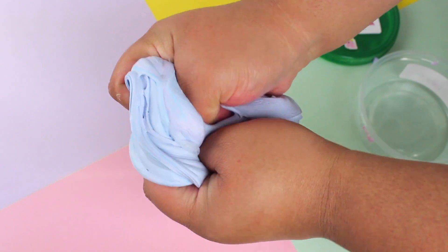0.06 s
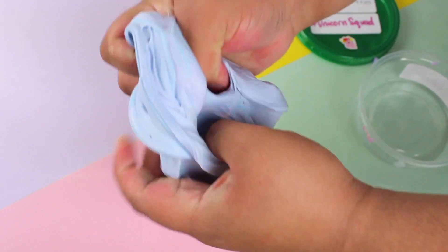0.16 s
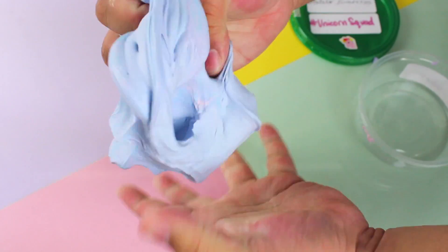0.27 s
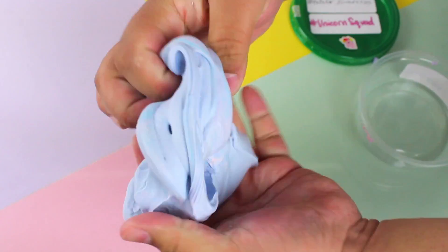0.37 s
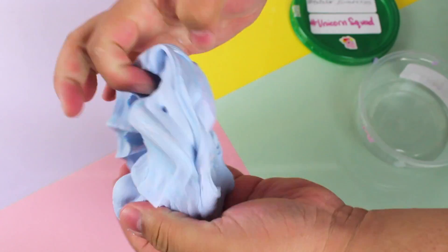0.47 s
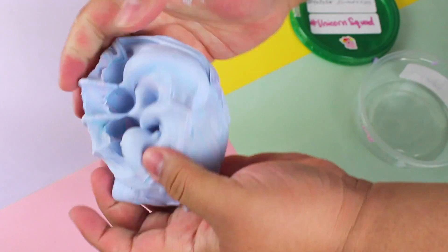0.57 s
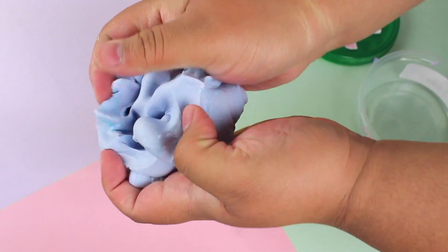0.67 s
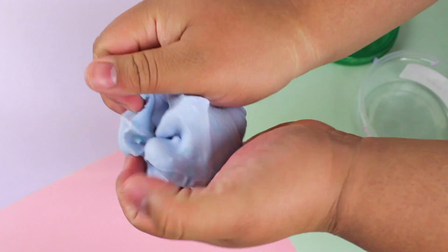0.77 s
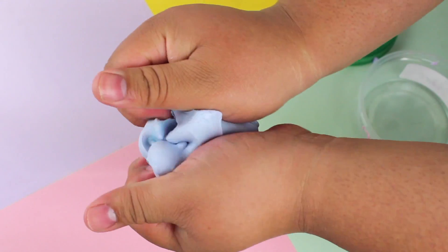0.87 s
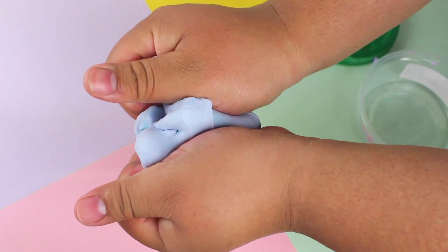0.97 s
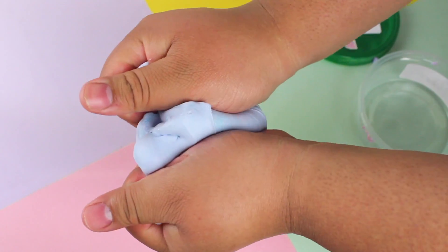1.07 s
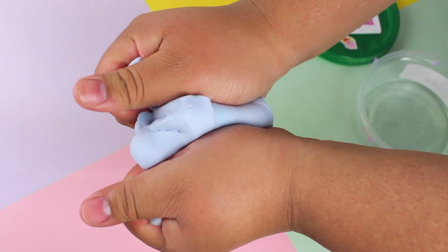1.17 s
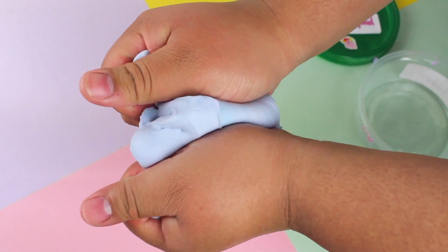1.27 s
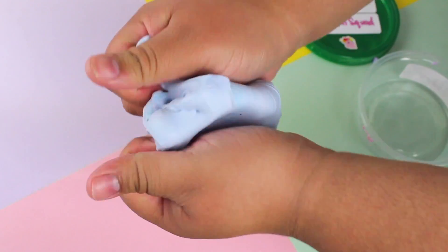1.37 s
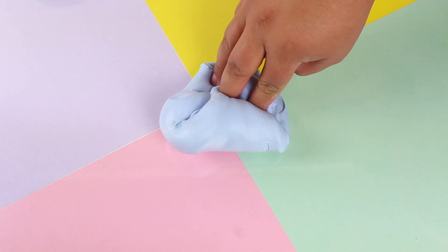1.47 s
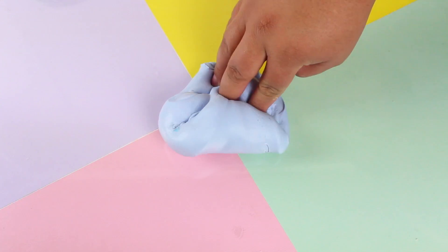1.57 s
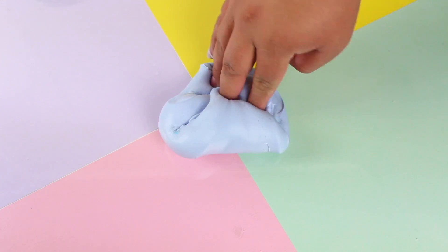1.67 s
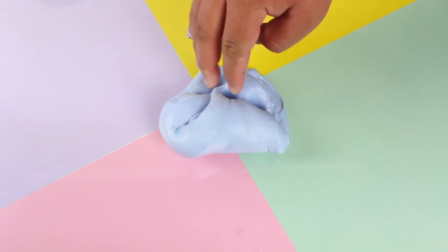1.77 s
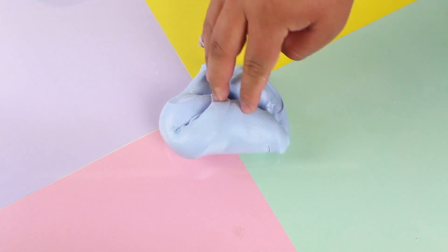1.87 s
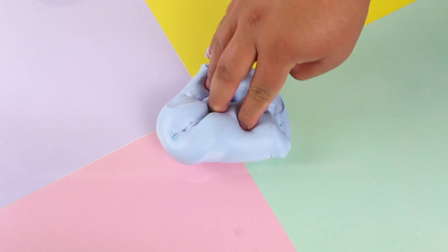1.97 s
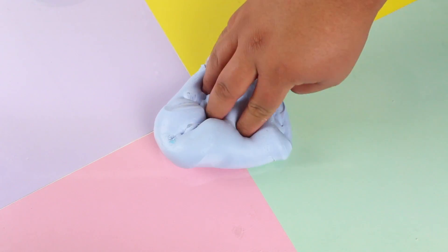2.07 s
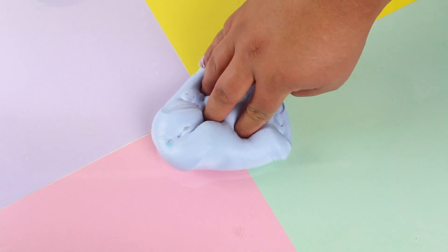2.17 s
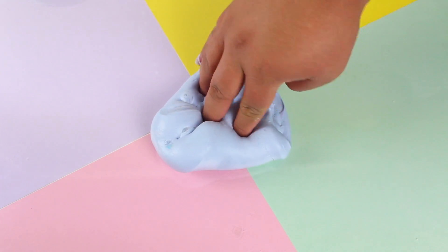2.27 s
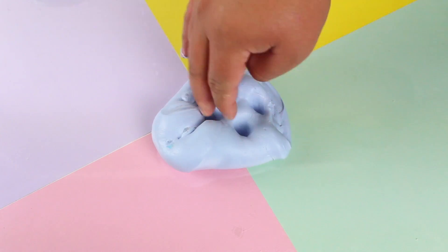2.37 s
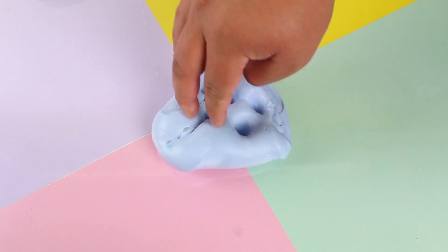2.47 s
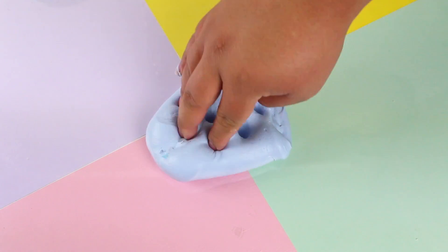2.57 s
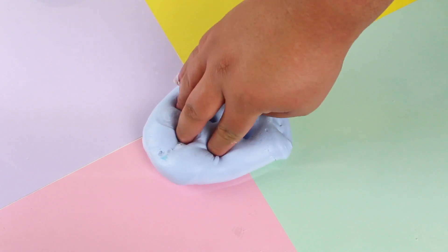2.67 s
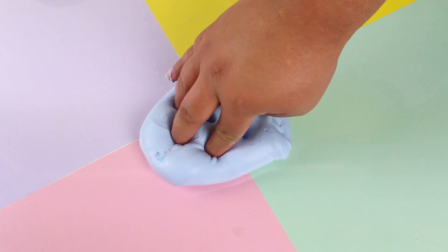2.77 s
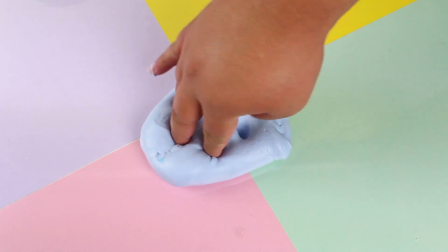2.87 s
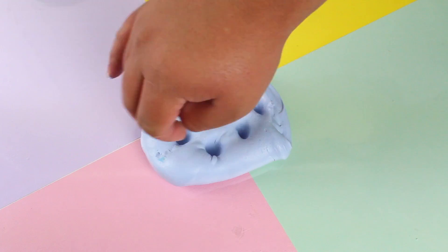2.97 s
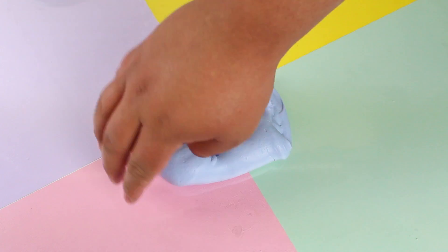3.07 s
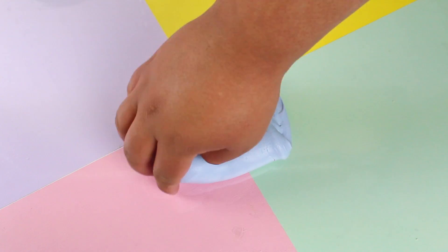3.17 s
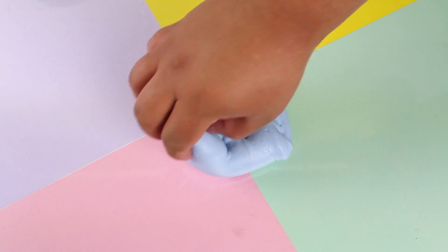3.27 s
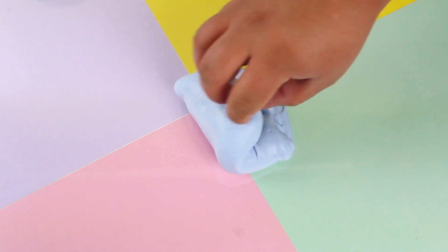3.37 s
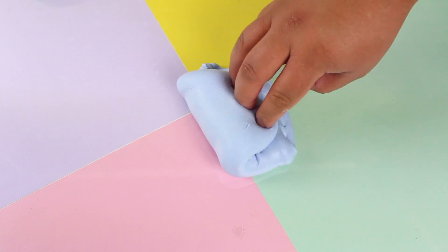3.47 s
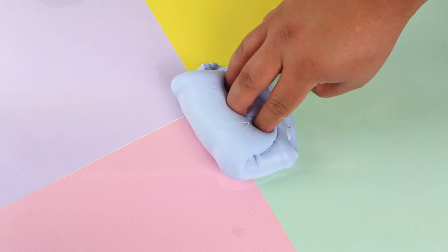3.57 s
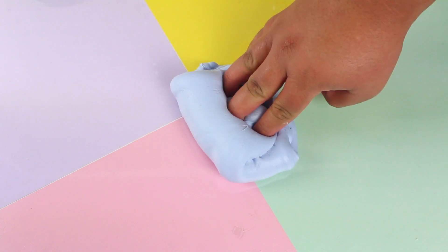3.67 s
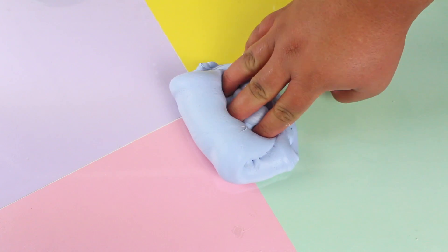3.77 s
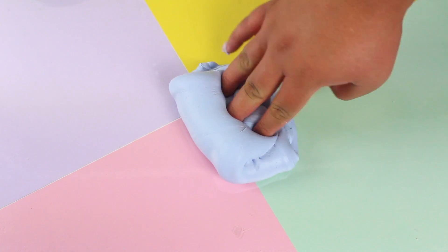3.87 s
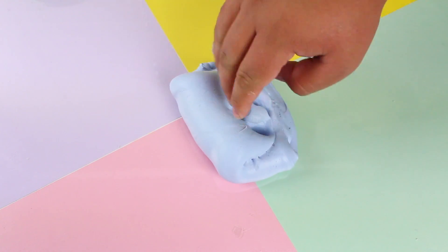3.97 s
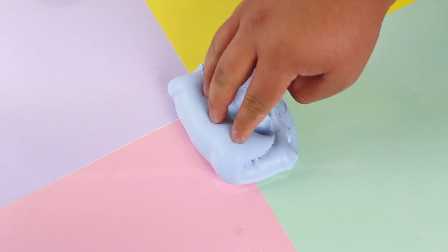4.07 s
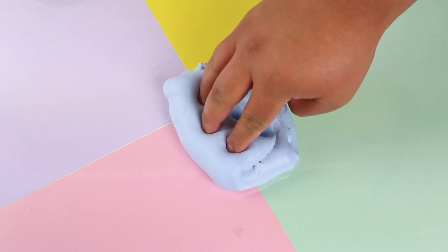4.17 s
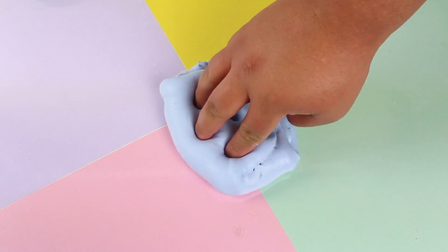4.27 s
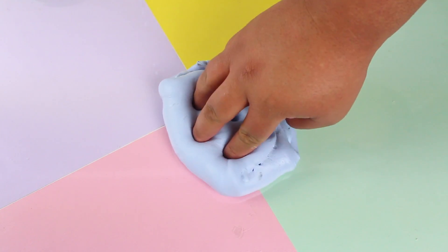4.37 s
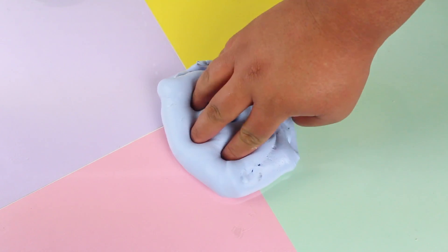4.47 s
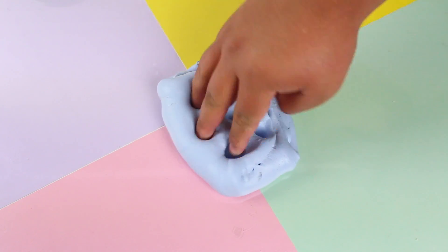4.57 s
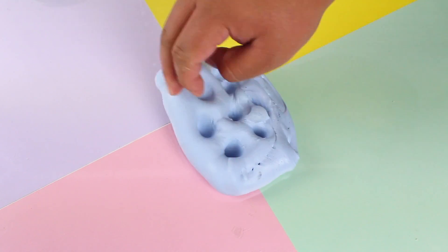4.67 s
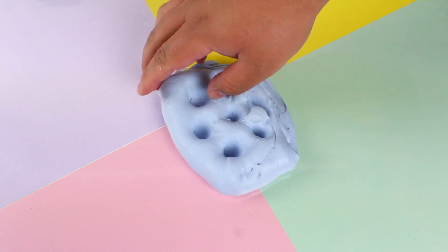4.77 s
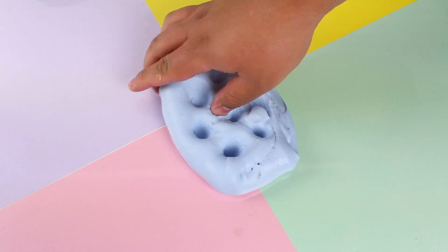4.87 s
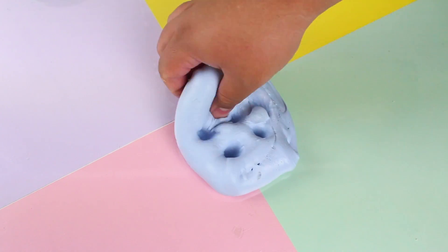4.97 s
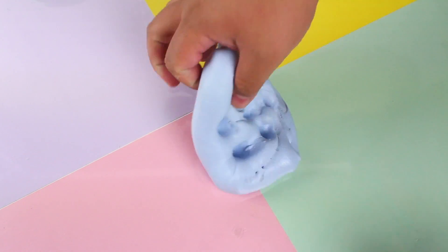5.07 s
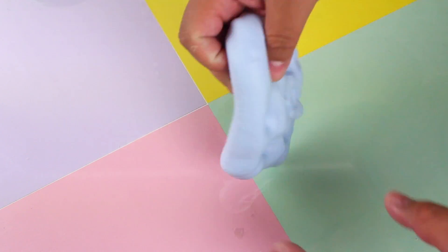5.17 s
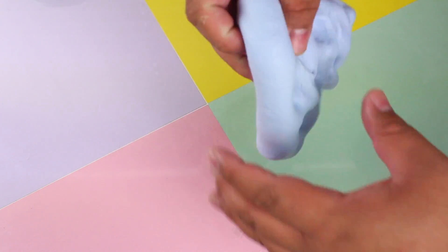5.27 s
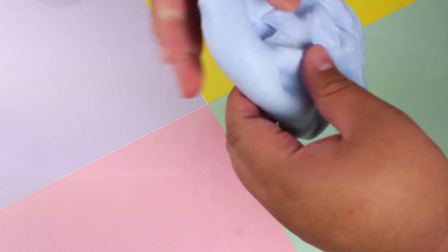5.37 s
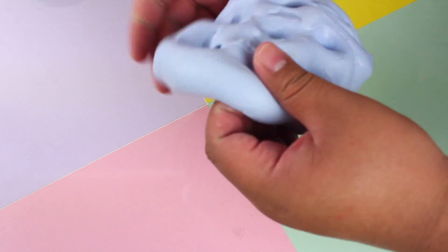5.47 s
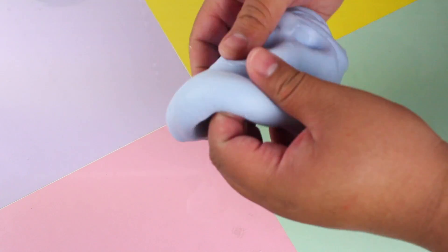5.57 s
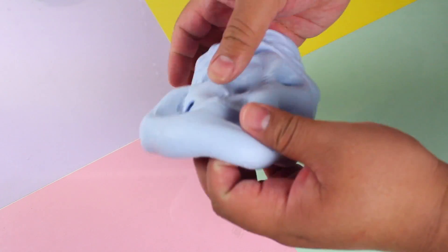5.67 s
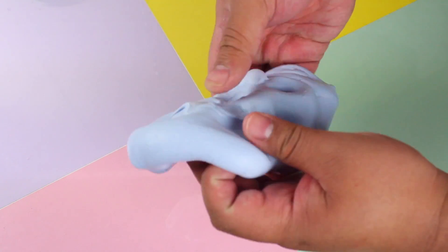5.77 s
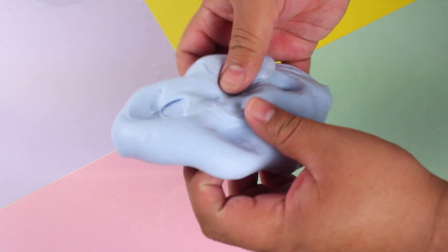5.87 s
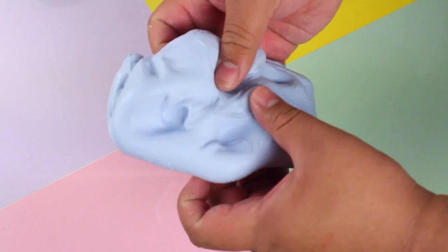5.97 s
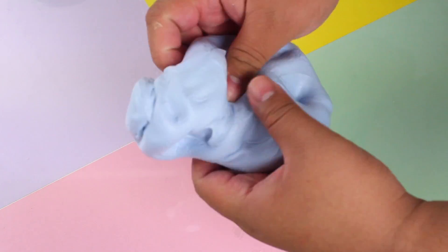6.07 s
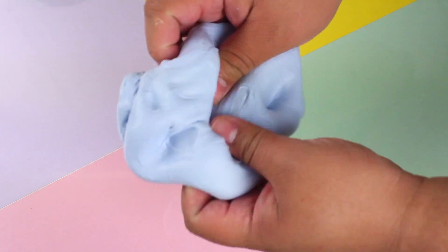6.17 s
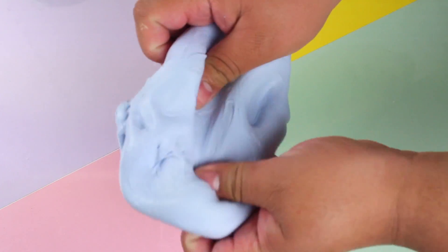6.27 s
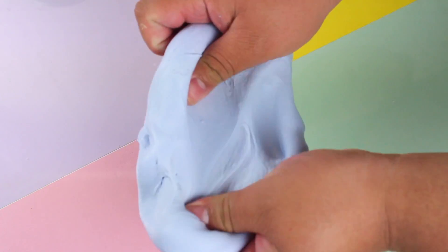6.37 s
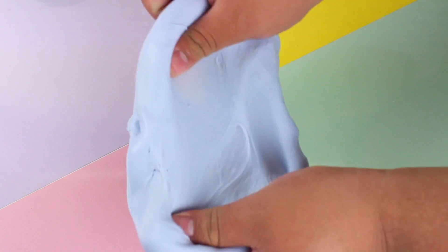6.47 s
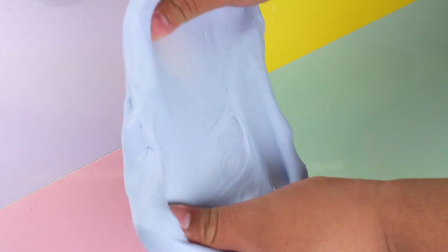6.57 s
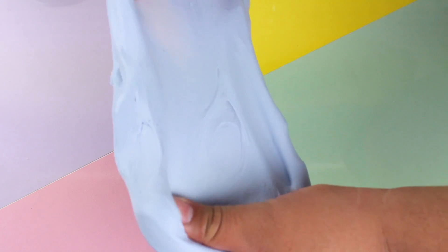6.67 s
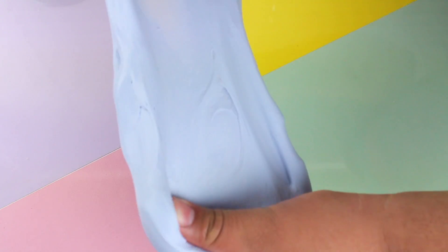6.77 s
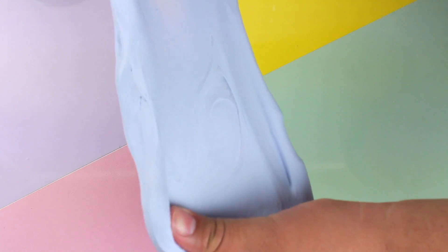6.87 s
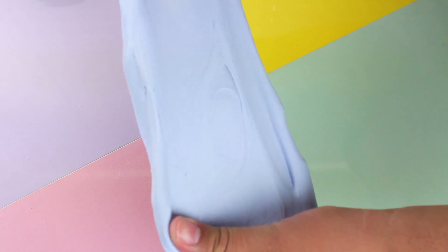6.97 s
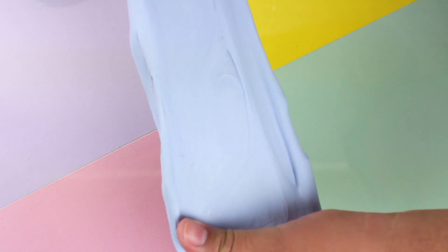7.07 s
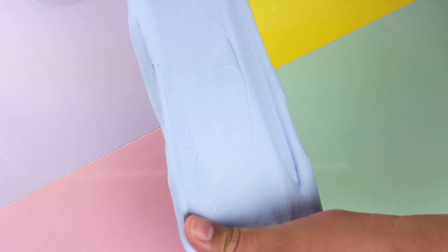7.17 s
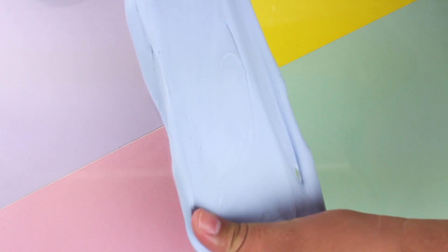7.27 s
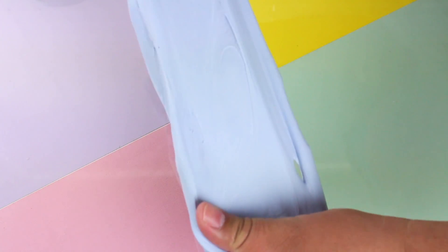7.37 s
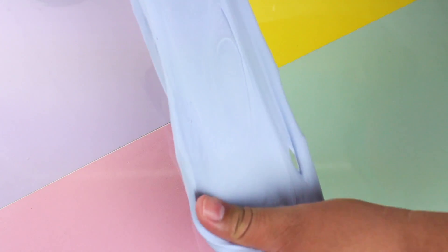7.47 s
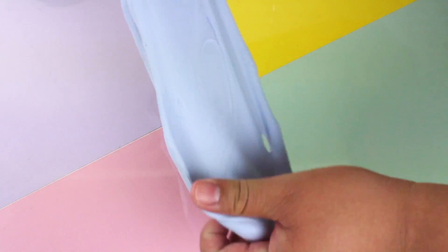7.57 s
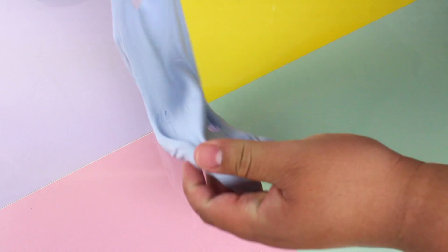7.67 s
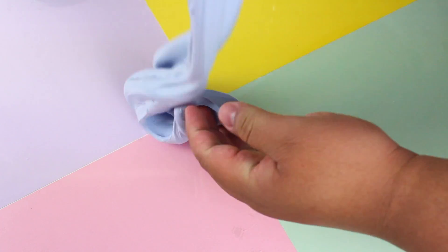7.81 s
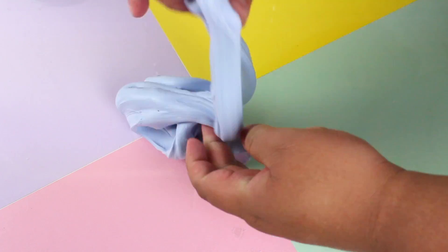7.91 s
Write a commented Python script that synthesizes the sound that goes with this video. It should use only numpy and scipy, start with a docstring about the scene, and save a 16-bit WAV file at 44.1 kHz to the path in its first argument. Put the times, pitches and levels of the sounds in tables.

```python
"""Over a faint hum in a small, quiet room, hands fold and squeeze thick slime on a table: skin crackles,
then trapped air bursts in sharp pops, made of damped pings and noise. A cut at 1.548 s ends this scene.
In the next, fingers pull out of their holes with hollow plops that shake the table, and hands land on slime
and table. Last, the slime is stretched into a sheet: noise and tiny ringing clicks give its crackle,
while gliding strings of bubbles let air squeak out."""
import sys
import numpy as np
from scipy import signal
from scipy.fft import rfft, irfft, next_fast_len
from scipy.io import wavfile

SR = 44100
rng = np.random.default_rng(int(sys.argv[2]) if len(sys.argv) > 2 else 0)


def store_wav(level_fs):
    """Save 16-bit WAV to argv[1]."""
    pcm = np.round(np.clip(np.atleast_2d(level_fs), -1, 1) * 32767)
    wavfile.write(sys.argv[1], SR, pcm.T.astype(np.int16))


N = 350149
TIME = np.arange(N) / SR  # seconds
CUT_S = 1.548  # a cut from the squeezing scene to the next one, in seconds

# Air pockets bursting between the palms. Each row: start in seconds, snap level in dB, snap pitch in Hz,
# snap length in cycles, pitch of the air pocket in Hz, pocket level in dB.
POPS = [(0.2189, -13, 3800, 6.6, 380, -25.5), (0.8715, -14, 2083, 3.9, 420, -35),
        (1.0211, -15.5, 3800, 2, 1200, -25), (1.2405, 8.5, 4080, 5.3, 2040, -1),
        (1.2803, -28, 1960, 3.3, 463, -15.5), (1.2892, -8.5, 4984, 4.2, 2519, -35),
        (1.3146, 2.5, 3900, 8, 1130, -7), (1.3184, 19, 3830, 4.5, 1001, -0.5),
        (1.3538, 9, 7000, 4.9, 2520, -0.5)]
# A finger pulls out of its hole. Each row: the six columns of POPS, then the level in dB of the
# peeling that leads up to it, before the trims in sliding and peeling.
PLOPS = [(1.7863, -6.5, 3910, 2.7, 1040, -17.5, -65.5), (1.7965, -11, 3000, 2, 1948, -10.5, -65.5),
         (2.4054, -0.5, 3030, 1.54, 944, -9, -53), (2.4376, -1, 1900, 3.2, 980, -11, -56),
         (2.9746, -15.5, 3160, 0.93, 520, -27.5, -48.5), (3.016, -4.5, 3030, 3, 1000, -12, -43.5),
         (3.9961, -9.5, 2120, 3.4, 660, -13.5, -43), (4.0219, -2, 2178, 6.9, 501, -10, -43),
         (4.6747, 6, 2280, 1.17, 470, -8, -62.5)]
# The hand lands on slime and table. Each row: start in seconds, thump level in dB before the table's trim,
# softness of the contact as a low-pass in Hz, pat level in dB, pat pitch in Hz, trapped air pitch in Hz.
LANDINGS = [(3.2337, -18, 211, -18.5, 1590, 647), (3.255, -17.5, 125, -33, 1990, 1500),
            (4.8288, -25, 250, -34.5, 1474, 450), (4.9562, -25, 346, -25, 1610, 322),
            (5.0138, -34.5, 300, -35, 1790, 650)]


def from_db(db):
    """Turn decibels into gain."""
    return 10 ** (np.asarray(db) / 20)


def rms_one(x):
    """Scale a sound to unit rms."""
    return x / np.sqrt(np.mean(x ** 2) + 1e-20)


def at_hz(points, hz):
    """Read a table between its points, on a log-frequency axis."""
    f, value = np.transpose(points)
    return np.interp(np.log(np.maximum(hz, 1)), np.log(f), value)


def butter(x, hz, kind, order=2):
    """Filter a sound with a causal Butterworth filter."""
    return signal.sosfilt(signal.butter(order, hz, kind, fs=SR, output="sos"), x)


def add(out, s, sound):
    """Mix a sound in at time s, in seconds."""
    i = max(int(round(s * SR)), 0)
    out[i:i + len(sound)] += sound[:max(N - i, 0)]


def drift(rate):
    """A smooth random curve of unit rms that heads for `rate` new values a second."""
    knots = rng.standard_normal(N // 20)
    return rms_one(np.interp(TIME * rate, np.arange(len(knots)), knots))


def coloured(spectrum):
    """Noise of unit rms with the given spectrum."""
    size = next_fast_len(N)
    gain = from_db(at_hz(spectrum, np.arange(size // 2 + 1) * SR / size))
    return rms_one(irfft(rfft(rng.standard_normal(size)) * gain, size)[:N])


def ping(hz, cycles, rise=0, size=3000):
    """A damped oscillation of peak 1 that falls by 60 dB in so many cycles while its pitch may rise."""
    t = TIME[:size]
    age = np.minimum(t * hz / cycles, 4)
    phase = 2 * np.pi * np.cumsum(hz * (1 + rise * np.minimum(age, 1))) / SR
    onset = 1 - np.exp(-2 * np.pi * hz * t)
    wave = np.diff(np.sin(phase) * from_db(-60 * age) * onset, prepend=0)
    return wave / np.abs(wave).max()


def background():
    """Soft rumble of room air with a few hum lines that waver slightly in level and phase."""
    # Each row: frequency in Hz, level in dB per Hz before scaling to unit rms.
    rumble_spectrum = [(15, -60.5), (25, -26.5), (53, -13.5), (92, -7.5), (123, -5.5), (170, -11),
                       (217, -5), (270, -9.5), (354, -7.5), (384, -12.5), (545, -18.5), (936, -25.5),
                       (1020, -27), (2760, -39), (16000, -47)]
    # Steady hum. Each row: frequency in Hz, middle level in dB rms.
    hum_lines = [(118.4, -75.5), (220.7, -63), (301.5, -65), (355.3, -70), (532.9, -71)]
    hum = np.zeros(N)
    for hz, db in hum_lines:
        level = from_db(db + 2.2 * drift(3.5)) * np.sqrt(2)
        hum += level * np.sin(2 * np.pi * hz * TIME + 1.4 * drift(4))
    return hum + from_db(-53) * coloured(rumble_spectrum)


def room_tails(build_s=.005, count=9):
    """Split the spectrum into overlapping bands, each with its own swell and decay of the room's answer."""
    # Each row: frequency in Hz, time in seconds for the room to fade by 60 dB.
    fade_times = [(100, 4), (300, 0.06), (700, 0.42), (1500, 0.33), (4000, 0.31), (8000, 0.29),
                  (15000, 0.5)]
    # Each row: frequency in Hz, level in dB of the room's answer before the level set for each sound.
    answer_levels = [(100, 1), (300, 5), (600, -3.5), (1500, -2), (4000, -8), (8000, -8), (15000, -18)]
    t, freqs = TIME[:2 ** 14], np.arange(2 ** 13 + 1) * SR / 2 ** 14
    hz = np.geomspace(60, 15000, count)[:, None]
    shares = np.array([np.interp(freqs, hz[:, 0], own) for own in np.eye(count)])
    decay = np.exp(-np.log(1000) * t / at_hz(fade_times, hz)) * (1 - np.exp(-t / build_s))
    energy = np.sum(decay ** 2, axis=1, keepdims=True)
    return shares, from_db(at_hz(answer_levels, hz)) * decay / np.sqrt(energy)


def in_room(sound, room, near_db, room_db, near_s=0.0041, near_start_s=0.00044):
    """Direct sound, scatter off hands and table, and a diffuse tail; hands move, so paths are new each time."""
    bands, decay = room
    t = TIME[:decay.shape[1]]
    near, far = rng.standard_normal((2, len(t)))
    near = butter(near * np.exp(-t / near_s) * (t > near_start_s), 5500, "low", order=1)
    tail = np.sum(irfft(rfft(far) * bands) * decay, axis=0)
    response = from_db(near_db) * np.sqrt(2 / (near_s * SR)) * near + from_db(room_db) * tail
    response[0] += 1  # direct sound
    return signal.fftconvolve(sound, response)


def table(level_db=-3.5, spread_db=4.5, low_share=0.22):
    """Each push or release rings the table's modes; a quicker contact reaches less far down."""
    # Ways the table top rings. Each row: frequency in Hz, relative level in dB, seconds to fade by 60 dB.
    modes = [(76.2, -5.5, 0.53), (120.6, -7, .2), (149.2, -5, 0.22), (197, -3, 0.29), (250, -15, 0.14),
             (295.2, -4, 0.33), (372.9, -6, 0.14), (469.8, -1, 0.087), (562, -4.5, 0.3)]
    out, t = np.zeros(N), TIME[:SR * 2 // 3]
    hz, mode_db, t60 = np.transpose(modes)[:, :, None]
    # each plop tugs at the table, a louder one a little harder, through a 410 Hz low-pass
    tugs = [(s, -23 + 0.17 * pocket_db, 410) for s, *_, pocket_db, _ in PLOPS]
    for s, blow_db, soft_hz, *_ in [*tugs, *LANDINGS]:
        strength = from_db(mode_db + spread_db * rng.standard_normal(hz.shape))
        strength = strength * rng.choice([-1, 1], hz.shape)
        rings = strength * np.sin(2 * np.pi * hz * t) * np.exp(-np.log(1000) * t / t60)
        softened = butter(rings.sum(axis=0), soft_hz, "low")
        thump = butter(softened, low_share * soft_hz, "high", order=1)
        add(out, s, from_db(blow_db + level_db) * thump)
    return butter(out, 80, "high", order=4)


def squirts(per_s=420, cycles=9.8, spread_db=2.5, scatter=0.05):
    """Air escapes as a quick string of bubbles whose pitch glides as the gap narrows or opens."""
    # Air squeezed through narrow gaps. Each row: start in seconds, length in seconds, first pitch in Hz,
    # last pitch in Hz, typical bubble level in dB at mid-string.
    gaps = [(5.46, 0.036, 870, 960, -39.5), (5.946, 0.034, 850, 1100, -46),
            (6.117, 0.11, 2580, 4630, -39.5), (7.275, 0.027, 1760, 1950, -47.5),
            (7.32, 0.025, 1950, 2230, -49.5), (7.618, 0.069, 2980, 2620, -37)]
    out = np.zeros(N)
    for s, length, start_hz, end_hz, db in gaps:
        # 64 possible bubbles, of which chance keeps about per_s a second
        for _ in range(64):
            phase, kept = rng.random(2)
            size, detune = rng.standard_normal(2)
            if kept < per_s * length / 64:
                hz = (start_hz + phase * (end_hz - start_hz)) * np.exp(scatter * detune)
                level = from_db(db + spread_db * size) * np.sqrt(np.sin(np.pi * phase))
                add(out, s + phase * length, level * ping(hz, cycles))
    return out


def faint_ticks(per_s=4.1, spread_db=2.5, middle_hz=3800, spread_octaves=0.45):
    """Pressing or pulling sets off runs of ticks of chance size and pitch; gives (s, dB, Hz) rows."""
    # Each row: start in seconds, length in seconds, typical level in dB before the trim in ticks.
    runs = [(0.497, 0.89, -36.5), (2.64, 0.18, -36), (4.27, 0.072, -38), (5.705, 0.94, -36),
            (7.199, 0.15, -46.5)]
    for start, length, db in runs:
        count = max(int(round(per_s * length)), 1)
        for k, (size, detune) in enumerate(rng.standard_normal((count, 2))):
            s = start + length * (k + rng.random()) / count
            yield s, db + spread_db * size, min(middle_hz * 2 ** (spread_octaves * detune), SR / 4)


def ticks(room, cycles=3.4, level_db=1.0, fray_db=-21, fray_s=0.006, body_ratio=0.4, body_db=-12):
    """Tiny bursts: a short ping with a frayed noise edge and a softer, lower body; gives (s, sound) pairs."""
    # Single larger bubbles and sticky threads snapping.
    # Each row: start in seconds, level in dB before the trim level_db, pitch in Hz.
    single_ticks = [(0.0326, -19.5, 5040), (0.0633, -20.5, 9300), (0.0911, -20.5, 3930),
                    (0.9292, -25.5, 2030), (1.1075, -9.5, 5630), (1.1383, -21, 4970), (1.1994, -23, 3900),
                    (1.311, -5, 4960), (2.105, -42.5, 1904), (2.1711, -41.5, 2870), (2.6764, -36, 1130),
                    (2.7801, -39.5, 2510), (3.4797, -39.5, 1814), (3.632, -33, 4260), (3.7573, -35, 2730),
                    (4.2454, -38.5, 2560), (4.8119, -32.5, 1470), (5.1452, -27.5, 3700),
                    (5.5553, -33, 3040), (5.6617, -32.5, 3690), (6.0185, -37, 7000), (6.1952, -45, 4200),
                    (6.534, -34, 6560), (7.014, -39.5, 3670), (7.8202, -28.5, 3720)]
    t = TIME[:SR // 100]
    for s, tick_db, hz in [*single_ticks, *faint_ticks()]:
        body = from_db(body_db) * ping(body_ratio * hz, cycles, size=len(t))
        tick = ping(hz, cycles, size=len(t)) + body
        fray = from_db(fray_db) * rng.standard_normal(len(t)) * np.exp(-t / fray_s)
        yield s, in_room(from_db(tick_db + level_db) * (tick + fray), room, near_db=0.5, room_db=-0.5)


def swell(s, rise_s, fade_s, depth_db=17):
    """Gain that grows to 1 at time s and dies away, evenly in dB; if it peaks before the cut, it ends there."""
    away = np.maximum((s - TIME) / rise_s, (TIME - s) / fade_s)
    return from_db(-depth_db * np.minimum(away, 10)) * ((TIME < CUT_S) | (s > CUT_S))


def sliding(rise_share=0.42):
    """Gains of squelch and hiss: the long stretch, each change of grip, and the peeling before each plop."""
    # The slime is drawn out into a sheet, crackling less as it thins.
    # Each row: time in seconds, squelch level in dB, sticky hiss level in dB, both before trims.
    stretch = [(5.24, -54.5, -70.5), (5.41, -56, -64.5), (5.47, -48.5, -54.5), (5.6, -57, -67),
               (5.76, -46.5, -59), (5.79, -59.5, -66), (5.96, -47.5, -57), (5.99, -66.5, -73.5),
               (6.18, -53, -62), (6.35, -60, -64), (6.56, -55, -58.5), (6.93, -79, -81), (7.02, -64, -74.5),
               (7.08, -74.5, -88), (7.23, -59.5, -80), (7.54, -82, -84)]
    # The hands change grip and slide over the slime. Each row: time of the peak in seconds,
    # length in seconds, squelch level in dB, sticky hiss level in dB, both before the trims in peeling.
    rubs = [(0.021, 0.092, -44, -50), (0.264, 0.19, -37.5, -38), (0.433, 0.25, -47.5, -50),
            (0.553, 0.16, -48, -49), (0.705, 0.32, -56.5, -57), (1.007, 0.32, -62, -58),
            (1.117, 0.28, -65, -51), (1.52, 0.3, -40.5, -39), (3.326, 0.36, -55, -56.5),
            (5.02, 0.17, -52, -58), (5.14, 0.26, -48.5, -50), (7.647, 0.18, -53.5, -52),
            (7.76, 0.58, -54, -56), (7.93, 0.12, -56, -56)]
    s, wet_db, sticky_db = np.transpose(stretch)
    levels = (wet_db - 6, sticky_db - 2.5)
    power = np.array([from_db(np.interp(TIME, s, db, left=-np.inf, right=-np.inf)) ** 2 for db in levels])
    for s, length, wet_db, sticky_db in rubs:
        gain = swell(s, rise_share * length, (1 - rise_share) * length)
        power += (from_db([[wet_db], [sticky_db]]) * gain) ** 2
    # the skin peels ever louder until the finger is free
    for s, *_, peel_db in PLOPS:
        power += (from_db([[peel_db], [peel_db - 3]]) * swell(s, rise_s=0.036, fade_s=0.022)) ** 2
    return np.sqrt(power)


def grains(spectrum, per_s, size_db, cycles, patchy_db, count=20):
    """Countless micro-bubbles of `count` pitches burst in clumps: random clicks ring resonators; unit rms."""
    sizes = from_db(size_db * np.minimum(rng.exponential(1, N), 4.5)) * rng.choice([-1, 1], N)
    clicks = sizes * (rng.random(N) < per_s / SR)
    dealt, out = rng.integers(0, count, N), np.zeros(N)  # each click is dealt to one pitch
    for k, hz in enumerate(np.geomspace(spectrum[0][0], min(spectrum[-1][0], SR / 3), count)):
        r = np.exp(-np.log(1000) * hz / (cycles * SR))
        resonator = [1, -2 * r * np.cos(2 * np.pi * hz / SR), r * r]
        rings = signal.lfilter([1, 0, -1], resonator, clicks * (dealt == k) + 1e-18)
        out += rms_one(rings) * np.sqrt(hz) * from_db(at_hz(spectrum, hz) + patchy_db * drift(35))
    return rms_one(out)


def peeling(squelch_db=2.0, hiss_db=-4.5, wet_smooth_db=-3, hiss_smooth_db=-1, slip_db=2.5, slips_per_s=70):
    """Wet crackle and a finer sticky hiss over smooth friction; skin sticks and slips in quick bursts."""
    # Wet squelch. Each row: frequency in Hz, relative level in dB per Hz.
    wet_spectrum = [(300, -8.5), (700, -1), (1150, 1), (1600, 2.5), (2300, -1.5), (4500, -3), (6500, -21.5)]
    # Sticky hiss. Each row: frequency in Hz, relative level in dB per Hz.
    sticky_spectrum = [(3000, -9), (5000, 0), (8000, 0.5), (12000, -2.5), (16000, -7.5)]
    wet, sticky = sliding()
    squelch = grains(wet_spectrum, per_s=2000, size_db=3.5, cycles=11.0, patchy_db=4.5)
    squelch += from_db(wet_smooth_db) * coloured(wet_spectrum)
    hiss = grains(sticky_spectrum, per_s=3100, size_db=2.5, cycles=9.9, patchy_db=1.0)
    hiss += from_db(hiss_smooth_db) * coloured(sticky_spectrum)
    squelch = wet * from_db(squelch_db) * butter(squelch, 280, "high")
    hiss = sticky * from_db(hiss_db) * butter(hiss, 4200, "high")
    return (squelch + hiss) * from_db(slip_db * drift(slips_per_s))


def thuds(thud_hz=190, cycles=5.0, level_db=-39):
    """The slime slumps into each burst pocket with a dull thud; gives (s, sound) pairs."""
    for s, snap_db, *_ in POPS:
        yield s, from_db(snap_db + level_db) * ping(thud_hz, cycles)


def holes(room, hole_hz=573, cycles=2.9, level_db=-7, delay_s=0.002034):
    """The finger-wide hole left open rings with one hollow note after each plop; gives (s, sound) pairs."""
    for s, *_, pocket_db, _ in PLOPS:
        note = from_db(pocket_db + level_db) * ping(hole_hz, cycles)
        yield s + delay_s, in_room(note, room, near_db=4.0, room_db=-1.0)


def pats(cycles=5, pocket_db=-30):
    """Skin pats the slime with a short snap and traps a little air; gives rows like those of POPS."""
    return [(s, pat_db, pat_hz, cycles, air_hz, pocket_db) for s, _, _, pat_db, pat_hz, air_hz in LANDINGS]


def pops(room, pocket_cycles=6.4, rise=0.09, overtone=2.2, overtone_db=-7,
         tear_db=-20, tear_s=0.0016, creak_db=-44, creak_s=0.012):
    """A pocket's skin strains and snaps; the air behind rings in two modes; gives (s, sound) pairs."""
    t = TIME[:SR // 16]
    for s, snap_db, snap_hz, snap_cycles, pocket_hz, pocket_db, *_ in [*POPS, *PLOPS, *pats()]:
        tear, creak = butter(rng.standard_normal((2, len(t))), 840, "high", order=1)
        snap = ping(snap_hz, snap_cycles, size=len(t)) + from_db(tear_db) * tear * np.exp(-t / tear_s)
        low_mode = ping(pocket_hz, pocket_cycles, rise, size=len(t))
        high_mode = ping(overtone * pocket_hz, pocket_cycles, rise, size=len(t))
        pocket = low_mode - from_db(overtone_db) * high_mode
        # the strain grows until the moment of the snap
        strain = butter(creak, 5000, "low", order=1) * np.exp((t - t[-1]) / creak_s)
        yield s - t[-1], from_db(snap_db + creak_db) * strain
        yield s, in_room(from_db(snap_db) * snap, room, near_db=-1.5, room_db=-5.5)
        yield s, in_room(from_db(pocket_db) * pocket, room, near_db=0.5, room_db=-4.5)


def scene():
    """A cut at CUT_S ends the squeezing scene, room tails and all; the next scene follows over the same hum."""
    bursts, room = np.zeros(N), room_tails()
    for s, sound in [*pops(room), *thuds(), *holes(room), *ticks(room)]:
        if s < CUT_S:
            sound = sound[:int((CUT_S - s) * SR)]
        add(bursts, s, sound)
    return (bursts + squirts() + peeling() + table() + background())[None]


def record(dry):
    """The loudest pops overload, one side of the wave sooner, which adds a low thud; the top is cut."""
    overloaded = butter(np.clip(dry, -1, .82), 20, "high", order=1)
    return signal.sosfilt(signal.ellip(10, .1, 85, 16200, fs=SR, output="sos"), overloaded)


dry = scene()
out = record(dry)
store_wav(out)
```